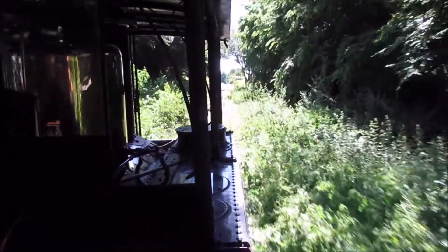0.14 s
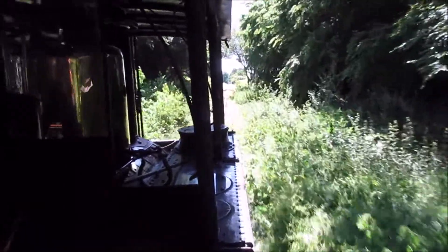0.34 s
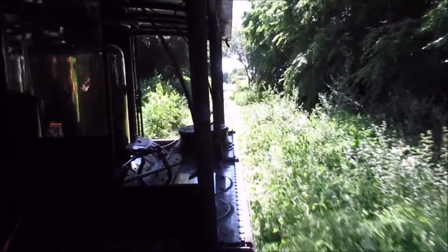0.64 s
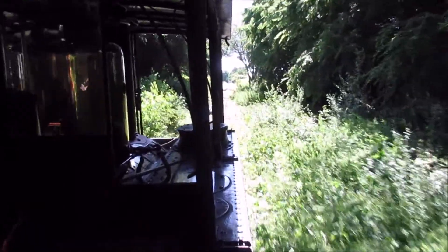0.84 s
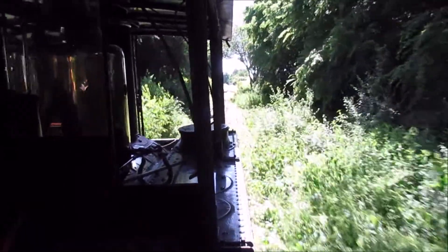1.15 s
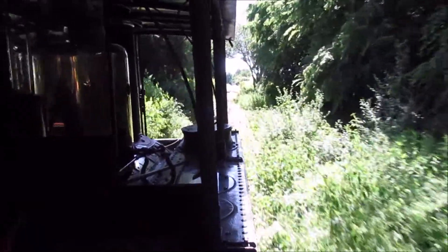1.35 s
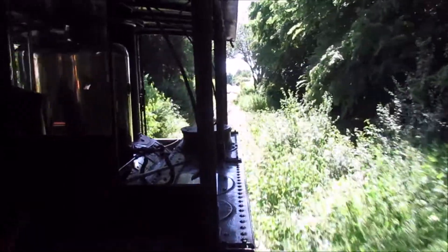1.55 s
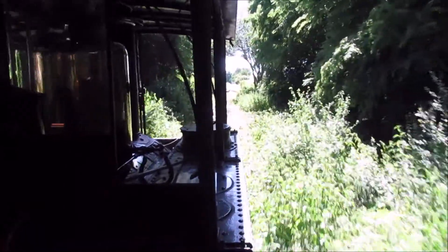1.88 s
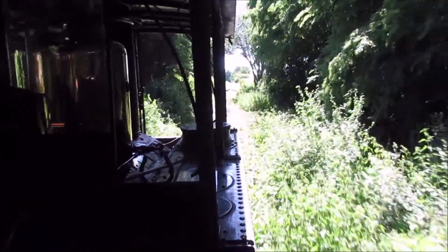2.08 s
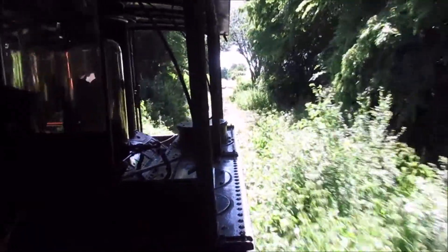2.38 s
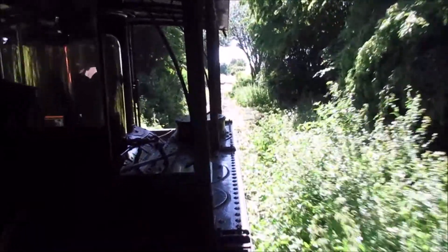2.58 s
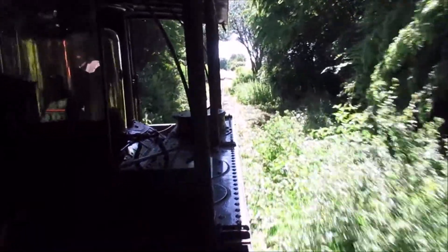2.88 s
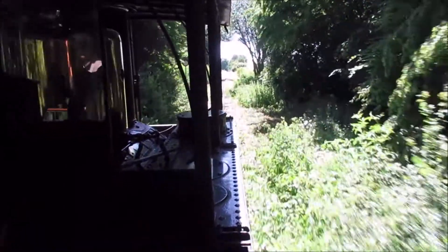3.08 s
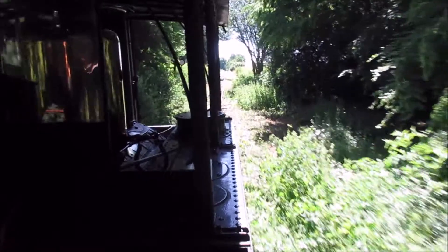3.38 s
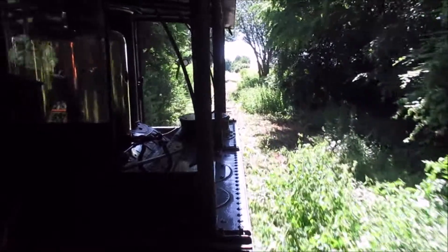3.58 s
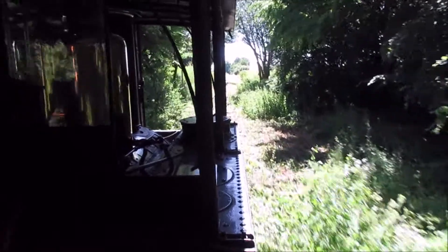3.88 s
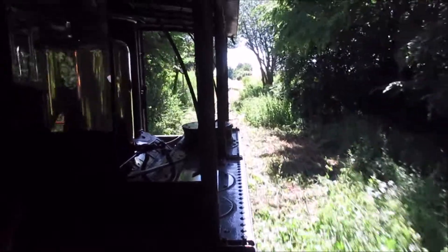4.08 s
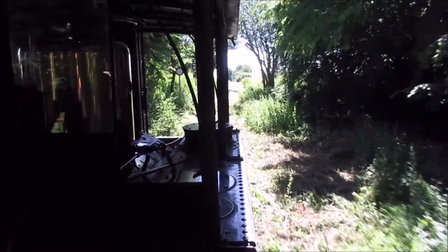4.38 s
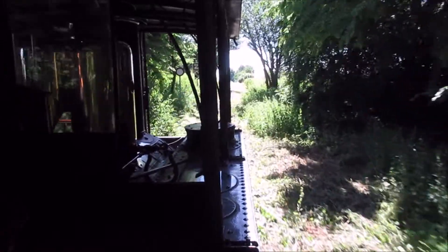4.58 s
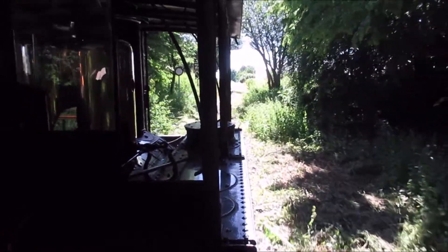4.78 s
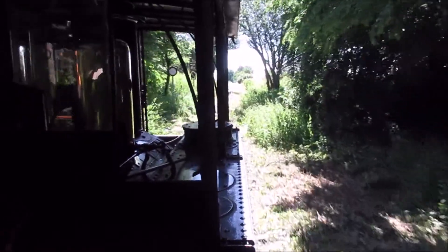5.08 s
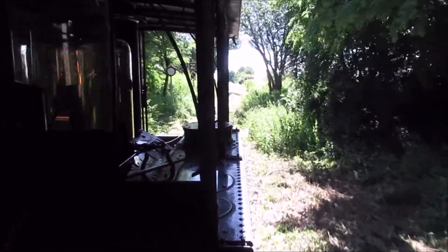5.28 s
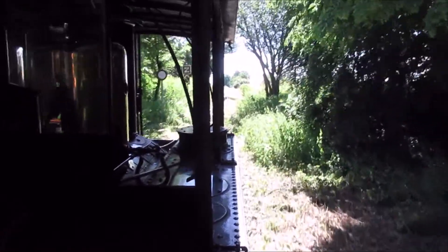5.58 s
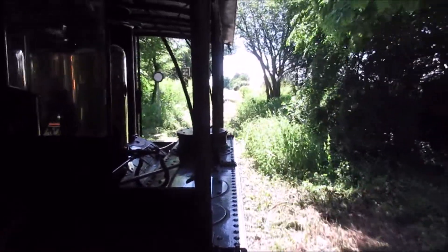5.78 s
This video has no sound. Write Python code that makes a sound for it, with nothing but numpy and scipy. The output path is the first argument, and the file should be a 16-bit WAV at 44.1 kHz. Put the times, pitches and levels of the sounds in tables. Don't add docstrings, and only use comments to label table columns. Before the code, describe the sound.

From 0 s a small steam locomotive's whistle sounds loudly: one nearly steady, mid-high note around 600 Hz, with strong third and fourth harmonics, hoarse breathy edges, tiny watery sputters and a roaring steam jet. Pitch edges up slightly, then droops as the valve closes at about 0.95 s; a short beating echo comes off the trees and a fainter tail fades quickly. During the blast the ride is ducked low. From about 1.2 s automatic gain lifts it steadily until 4.6 s: broad steam hiss with metallic cab colouring, dull at first and brightening, over low wheel roar and boxy frame boom. Soft, irregular thuds and knocks come through, more prominent after 4.2 s, strongest around 5.3-5.4 s. The full-level hiss and rumble waver slightly and continue to the end. Mostly central onboard sound, peaks softly limited, with brief compression thinning and small treble patches spreading sideways.

```python
import sys
import numpy as np
from scipy import signal
from scipy.fft import rfft, irfft, next_fast_len
from scipy.io import wavfile

SR = 44100
rng = np.random.default_rng(int(sys.argv[2]) if len(sys.argv) > 2 else 0)


def to_wav(sig):
    pcm = np.clip(np.atleast_2d(sig), -1, 1) * 32767
    pcm = np.round(pcm).astype(np.int16)
    wavfile.write(sys.argv[1], SR, pcm.T)


def gain_from_decibels(decibels):
    exponent = np.asarray(decibels, float) / 20
    return 10 ** exponent


N = 261934

# (time [s], pitch [Hz], fundamental level [dB])
WHISTLE_BLAST = [
    (0, 594, -14),
    (.038, 600, -9.5),
    (.14, 601, -10.5),
    (.23, 605.4, -10.5),
    (.42, 605.3, -12),
    (.7, 606.5, -11.5),
    (.87, 606.2, -11.5),
    (.95, 598.2, -12.5),
]
# (multiple [1], level [dB], breathy share [0-1], breath width [Hz])
PIPE_PARTIALS = [(1, 0.5, 0.08, 35), (2, -15.5, 0.22, 25), (3, 2.5, 0.37, 47), (4, 2.5, 0.42, 49),
                 (5, -3.5, 0.78, 140), (6, -14.5, 1, 61), (7, -16, .85, 60), (8, -13, .8, 60),
                 (9, -22, 0.5, 44)]
# (time [s], choke of third partial [dB])
WATER_SPUTTERS = [
    (.021, 19),
    (.146, 9),
    (.752, 16),
    (.838, 2),
    (.905, 7),
    (.953, 5),
]
# (frequency [Hz], density [dB per Hz])
JET_SPECTRUM = [(300, -18), (700, -7), (1500, -7.5), (3000, -0.5), (6000, -4.5), (10000, -8), (15000, -14)]
# (frequency [Hz], density [dB per Hz])
HISS_SPECTRUM = [(240, -25), (400, 0), (452, -4), (745, -4), (935, -7.5), (1160, -3), (1820, -7),
                 (2090, -4.5), (2620, -1), (4260, -4), (5510, -2.5), (7810, -5.5), (8560, -5),
                 (13500, -12.5), (15000, -16.5)]
# (frequency [Hz], width [Hz], lift [dB])
CAB_RESONANCES = [(741, 90, 3.5), (1127, 99, 3.5), (1435, 35, 4.5), (2078, 32, 6), (2172, 33, 5.5),
                  (2606, 100, 3.5), (2896, 69, 1), (3165, 93, 2.5), (3517, 49, 6.5), (3890, 380, 2.5),
                  (4183, 74, 5), (4510, 69, 5), (4836, 82, 2), (4935, 60, 6), (5432, 130, 6), (6000, 67, 5),
                  (6240, 40, 2), (8680, 300, 1.5), (8260, 190, -1.5), (10870, 66, 2.5)]
# (frequency [Hz], density [dB per Hz])
WHEEL_SPECTRUM = [(15, -50), (25, -52), (59, -4.5), (78, 0), (107, 4), (145, -6.5), (200, -3), (260, -28),
                  (440, -120)]
# (frequency [Hz], density [dB per Hz])
FRAME_SPECTRUM = [(82, -20.5), (140, -2), (205, -3.5), (257, -7.5), (302, -3.5), (470, -13), (600, -15.5),
                  (780, -10), (1320, -120)]
# (time [s], peak level [dB], pitch [Hz])
WHEEL_JOLTS = [(.449, -19, 86.1), (.817, -13, 115), (1.456, -19, 109), (1.829, -13.5, 110),
               (2.082, -15, 93), (2.183, -20.5, 91.5), (2.298, -19, 93), (2.585, -12.5, 97),
               (2.959, -27, 146), (3.083, -12, 119), (3.311, -18, 78), (3.453, -17, 86), (4.043, -18, 123),
               (4.137, -23, 123), (4.383, -14, 104), (4.467, -18, 149), (4.576, -19, 101.7),
               (4.671, -18, 117.4), (4.846, -13.5, 99), (4.991, -19, 99), (5.114, -24, 81),
               (5.255, -19, 80), (5.36, -17, 96), (5.605, -24, 79.4), (5.72, -27, 106), (5.801, -19, 103)]
# (time [s], peak level [dB], pitch [Hz])
FRAME_BUMPS = [(1.485, -9, 171), (1.645, -11, 150), (1.695, -12, 232), (1.78, -9, 170), (1.855, -10, 150),
               (1.965, -10.5, 198), (2.97, -10, 163), (3.085, -10.5, 195.5), (3.559, -23, 181),
               (3.612, -21, 176), (4.168, -27, 237), (4.253, -17, 197), (4.45, -14, 318), (4.569, -12, 234),
               (4.696, -29, 215), (4.749, -16, 213), (4.871, -20, 317), (4.924, -20, 347),
               (4.987, -12, 203), (5.16, -11, 209), (5.202, -14.5, 316), (5.281, -8.5, 223),
               (5.31, -10.5, 314), (5.43, -6, 273), (5.475, -16, 252), (5.594, -19, 169),
               (5.666, -14.5, 184.2), (5.802, -29, 198), (5.897, -12.5, 313)]
DROPOUTS = [(1, 9), (27, 40), (39, 13), (77, 10), (79, 20), (82, 17), (85, 24), (86, 20), (100, 13),
            (145, 21), (156, 18), (214, 19), (215, 14), (219, 11), (226, 14), (227, 10), (229, 16),
            (232, 18), (248, 9), (267, 11)]
# (frequency [Hz], level [dB])
DROPOUT_TILT = [(150, 1), (1000, -0.5), (3000, 1), (5000, 0), (8000, -2), (12000, -4.5)]
# (time [s], lowest frequency [Hz])
WIDE_PATCHES = [(.549, 5167), (.549, 9300), (.642, 5167), (.642, 6286), (.921, 4400), (.921, 9645),
                (1.408, 13779), (2.012, 10334), (2.291, 9645), (2.314, 4600), (2.314, 6889), (2.337, 7578),
                (2.593, 4650), (2.593, 12800), (2.686, 5683), (2.686, 8956), (2.871, 13090), (2.941, 10000),
                (3.638, 13779), (3.823, 6889), (3.823, 8956), (4.775, 10000), (5.17, 9645), (5.193, 5900),
                (5.425, 6911), (5.425, 12401), (5.472, 14468), (5.681, 14468), (5.681, 6600), (5.751, 9645)]

HOP = 1024


def rms_one(x):
    return x / np.sqrt(np.mean(x ** 2) + 1e-20)


def in_time(rows):
    s, *columns = np.transpose(rows)
    return [np.interp(np.arange(N) / SR, s, column) for column in columns]


def at_hz(points, hz):
    point_hz, value = np.transpose(points)
    return np.interp(np.log(hz + 1), np.log(point_hz), value)


def drift(hz):
    pole = np.exp(-40 * np.pi * hz / SR)
    noise = rng.standard_normal(N // 20 + 3002)
    slow = signal.lfilter([1], [1, -2 * pole, pole * pole], noise)[3000:]
    return np.interp(np.arange(N) / 20, np.arange(len(slow)), rms_one(slow))


def coloured(spectrum, peaks=()):
    walls_db, walls_decay_s = -11.5, .012
    size = next_fast_len(N)
    hz = np.arange(size // 2 + 1) * SR / size
    level_db = at_hz(spectrum, hz)
    for centre, width, lift_db in peaks:
        level_db = level_db + lift_db / (1 + (2 * (hz - centre) / width) ** 2)
    walls = 1
    for k, lag in enumerate(np.sort(rng.uniform(.003, .04, 14))):
        reflection = gain_from_decibels(walls_db) * np.exp(-lag / walls_decay_s - 2j * np.pi * hz * lag)
        walls = walls + reflection * (-1) ** k
    noise = rfft(rng.standard_normal(size))
    return rms_one(irfft(noise * gain_from_decibels(level_db) * walls, size)[:N])


def tree_echo(late, flow):
    beat_s = .034
    near = gain_from_decibels(-24 - 230 * late) * np.sin(np.pi * late / beat_s)
    far = gain_from_decibels(-44 - 45 * late) * (1 - flow) * drift(12)
    return near + far


def whistle():
    valve_shut_s, valve_fall_s, droop_hz = 0.95, 0.024, 4.5
    full_hz, sputter_s, echo_start_s = 607, 0.0049, .982
    t = np.arange(N) / SR
    pitch_hz, low_db = in_time(WHISTLE_BLAST)
    choke_db = sum(db * np.exp(-((t - s) / sputter_s) ** 2) for s, db in WATER_SPUTTERS)
    third_db = -22 + 0.56 * (pitch_hz - full_hz) - choke_db
    high_db = -28.5 - 0.03 * (pitch_hz - full_hz) + 0.22 * choke_db
    flow = np.exp(-(np.maximum(t - valve_shut_s, 0) / valve_fall_s) ** 2)
    late = np.maximum(t - echo_start_s, 0)
    echo = tree_echo(late, flow)
    droop = droop_hz * (1 - flow) * (late == 0)
    echo_lift = (full_hz - pitch_hz) * (late > 0)
    phase = 2 * np.pi * np.cumsum(pitch_hz - droop + echo_lift + 1.2 * drift(26)) / SR
    tone = 0
    for k, db, breathy, width_hz in PIPE_PARTIALS:
        breath = (drift(width_hz) + 1j * drift(width_hz)) / np.sqrt(2)
        blur = np.sqrt(1 - breathy ** 2) + breathy * breath
        if k < 3:
            level = flow * gain_from_decibels(low_db)
        elif k == 3:
            level = flow ** .5 * gain_from_decibels(third_db)
        else:
            level = flow * gain_from_decibels(high_db)
        level = level + echo * gain_from_decibels(-8 * (k - 1.5))
        lag = .6 * (k - 1)
        tone = tone + level * gain_from_decibels(db) * np.sqrt(2) * np.real(blur * np.exp(1j * (k * phase - lag)))
    return tone


def jet():
    rise_s, fall_start_s = 0.049, 0.87
    t = np.arange(N) / SR
    level_db = -25.5 - 4 * t - 110 * np.maximum(t - fall_start_s, 0)
    return gain_from_decibels(level_db) * (1 - .5 * np.exp(-t / rise_s)) * coloured(JET_SPECTRUM)


def patchy(x, bright_db, patchy_db):
    size, out = next_fast_len(N), 0
    lines = rfft(x, size)
    octave = np.log2(np.arange(size // 2 + 1) * SR / size + 1)
    for centre in np.arange(8, 14.6, .5):
        share = np.clip(1 - abs(np.clip(octave, 8, 14.5) - centre) * 2, 0, 1)
        follows = np.clip((centre - 11.6) / .8, 0, 1)
        level_db = patchy_db * drift(2.8) + follows * bright_db
        out = out + gain_from_decibels(level_db) * irfft(lines * share, size)[:N]
    return out


def steam():
    dull_db, recovery_s = 4.5, 1.13
    poses = gain_from_decibels(2.4 * np.array([drift(.8) for pose in range(3)]))
    poses = poses / np.sqrt(np.sum(poses ** 2, axis=0))
    hiss = sum(pose * coloured(HISS_SPECTRUM, CAB_RESONANCES) for pose in poses)
    bright_db = .2 * drift(1.36) - dull_db * np.exp(-np.arange(N) / SR / recovery_s)
    return gain_from_decibels(-16.39) * patchy(hiss, bright_db, patchy_db=0.04)


def roar():
    still_air_db, gather_s = 2.5, 1.5
    wheels_db = -28 - still_air_db * np.exp(-np.arange(N) / SR / gather_s) + 0.88 * drift(6.0)
    wheels = gain_from_decibels(wheels_db) * coloured(WHEEL_SPECTRUM)
    frame_db = -28.5 + 1.1 * drift(4.1)
    return wheels + gain_from_decibels(frame_db) * coloured(FRAME_SPECTRUM)


def bumps(table, swell_s):
    out = np.zeros(N + SR)
    t = np.arange(SR // 5) / SR
    envelope = t / swell_s * np.exp(1 - t / swell_s)
    for s, db, hz in table:
        start = round(s * SR)
        cycles = hz * (t + .5 * swell_s * (1 - np.exp(-t / swell_s)))
        out[start:start + len(t)] += gain_from_decibels(db - 6.5) * envelope * np.sin(1.7 * np.pi * cycles)
    return out[:N]


def rumble():
    return roar() + bumps(WHEEL_JOLTS, .014) + bumps(FRAME_BUMPS, .006)


def gain_control():
    release_s, full_s, climb_db_per_s, hunt_db, hunt_period_s = 1.2, 4.582, 4, 0.46, 0.64
    t = np.arange(N) / SR
    hunting = hunt_db * np.sin(2 * np.pi * np.maximum(t - full_s, 0) / hunt_period_s)
    return gain_from_decibels(climb_db_per_s * (np.clip(t, release_s, full_s) - full_s) + hunting)


def scene():
    blast = whistle() + jet()
    ride = gain_control() * (steam() + rumble())
    return np.tile(blast + ride, (2, 1))


def limiter(x):
    ceiling = .7
    return x / (1 + (abs(x) / ceiling) ** 6) ** (1 / 6)


def lapped(window):
    n, lines = np.arange(2 * HOP) + .5, np.arange(HOP) + .5
    return window[:, None] * np.cos(np.pi / HOP * np.outer(n + HOP / 2, lines))


def dropouts(x):
    first, up, down = 528, 160, 147
    fast = np.pad(signal.resample_poly(x, up, down), HOP)
    basis = lapped(signal.windows.cosine(2 * HOP))
    line_hz = np.arange(HOP) * SR * up / down / 2 / HOP
    tilt = gain_from_decibels(at_hz(DROPOUT_TILT, line_hz))
    error = np.zeros_like(fast)
    for frame, kept in DROPOUTS:
        span = slice(first + frame * HOP, first + (frame + 2) * HOP)
        lines = fast[span] @ basis
        step = tilt * np.sort(abs(lines) / tilt)[-kept] / .6
        coarse = np.sign(lines) * np.floor(abs(lines) / step + .4 + 1e-9) * step
        error[span] += basis @ (coarse - lines) * 2 / HOP
    return x + signal.resample_poly(error[HOP:-HOP], down, up)[:N]


def widen_patches(x):
    first = 671
    mid, side = x.copy(), np.zeros(N)
    hz = (np.arange(HOP) + .5) * SR / 2 / HOP
    basis = lapped(signal.windows.kaiser_bessel_derived(2 * HOP, 4 * np.pi))
    fills = rng.uniform(-0.9, 1, (len(WIDE_PATCHES), HOP)) * np.sqrt(3)
    for (s, low_hz), fill in zip(WIDE_PATCHES, fills):
        start = first + (round((s * SR - first) / HOP) - 1) * HOP
        span = slice(start, start + 2 * HOP)
        inside = (hz > low_hz) * (hz < low_hz + min(.22 * low_hz, 1500))
        band = x[span] @ basis * inside
        level = np.sqrt(np.sum(band ** 2) / inside.sum() / 2)
        mid[span] -= basis @ band * (1 - np.sqrt(.5)) * 2 / HOP
        side[span] += basis @ (gain_from_decibels(1.5) * level * fill * inside) * 2 / HOP
    return np.array([mid + side, mid - side])


def top_cut(x):
    return signal.sosfilt(signal.butter(12, 15180, fs=SR, output="sos"), x)


def record(dry):
    held = limiter(dry[0])
    mix = widen_patches(dropouts(held))
    return top_cut(mix)


dry = scene()
out = record(dry)
to_wav(out)
```